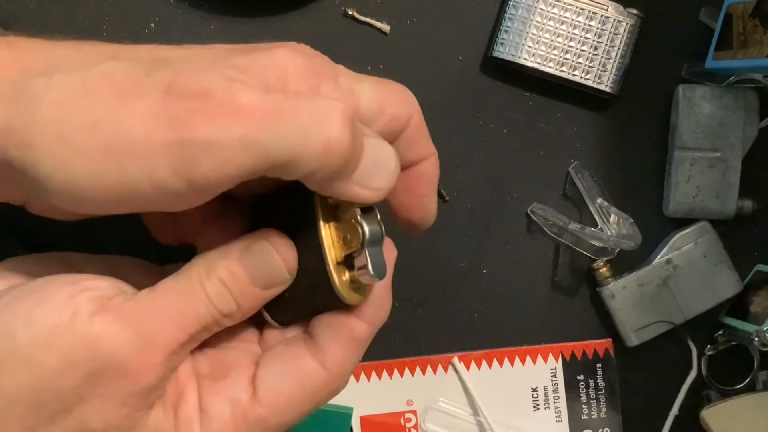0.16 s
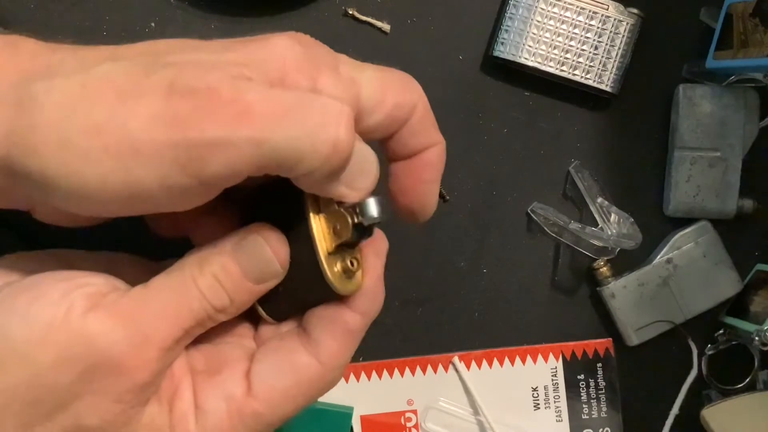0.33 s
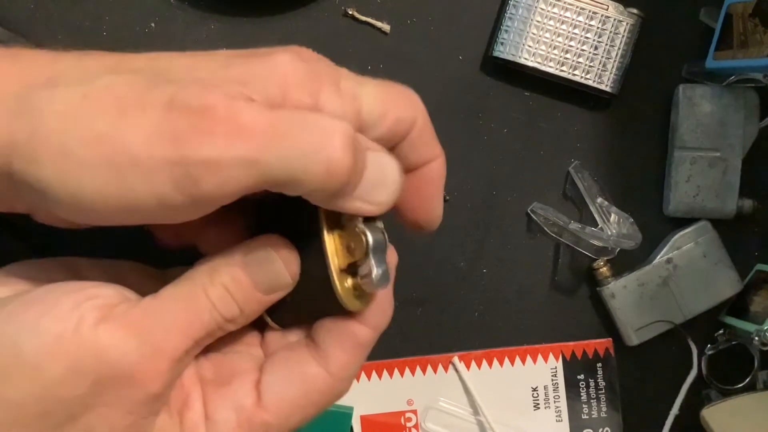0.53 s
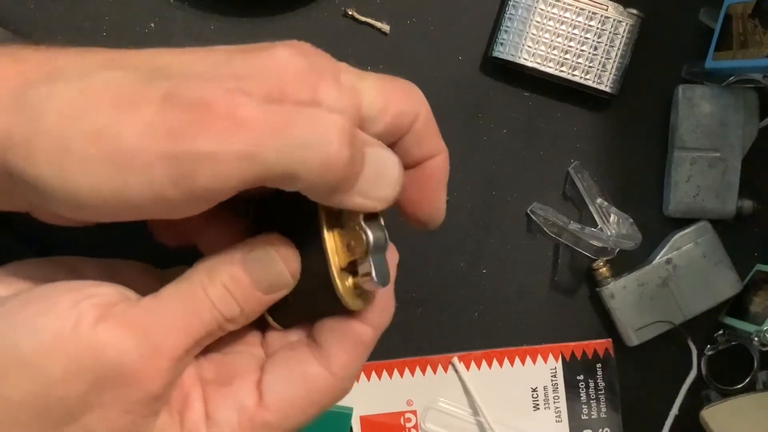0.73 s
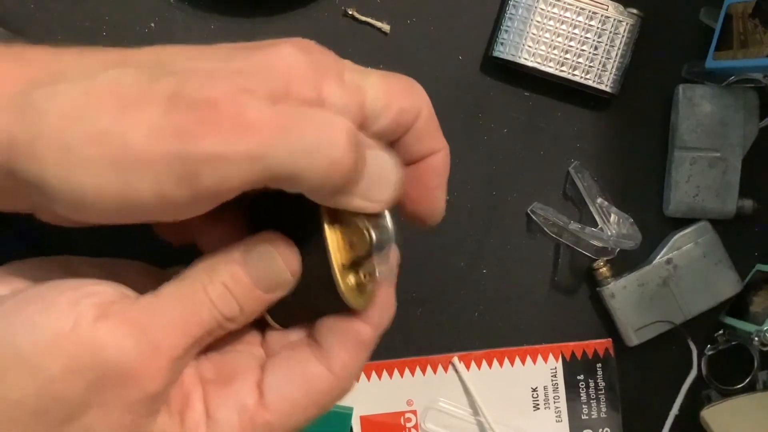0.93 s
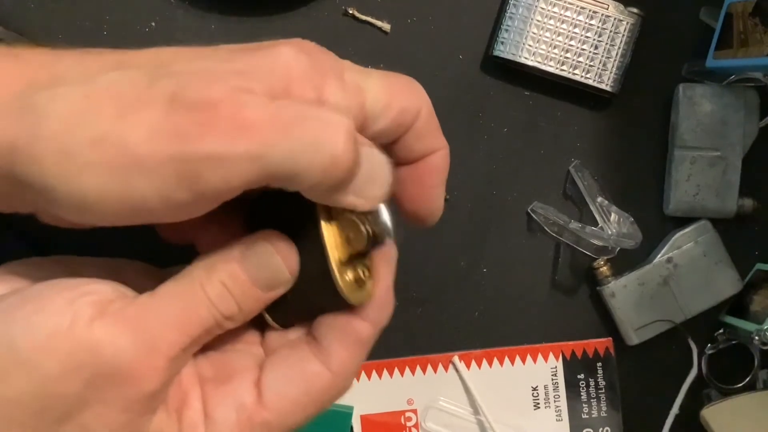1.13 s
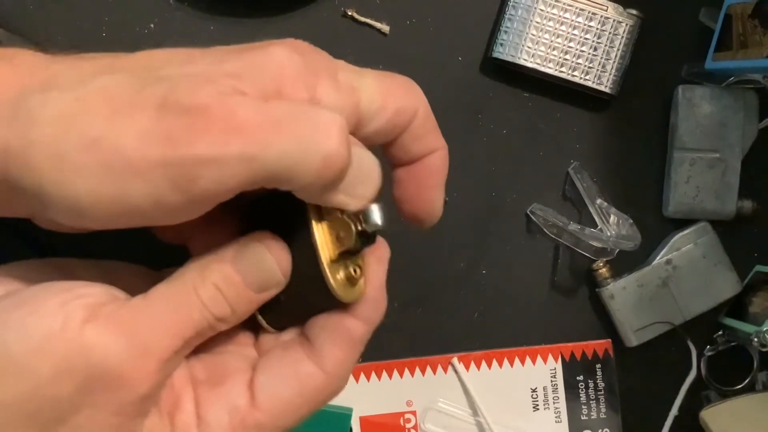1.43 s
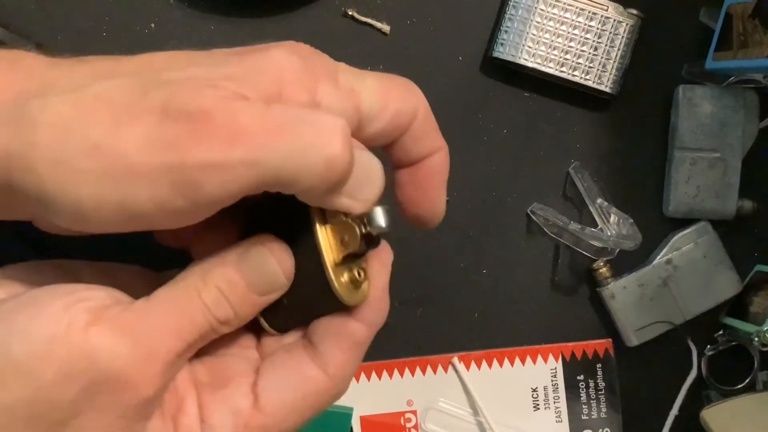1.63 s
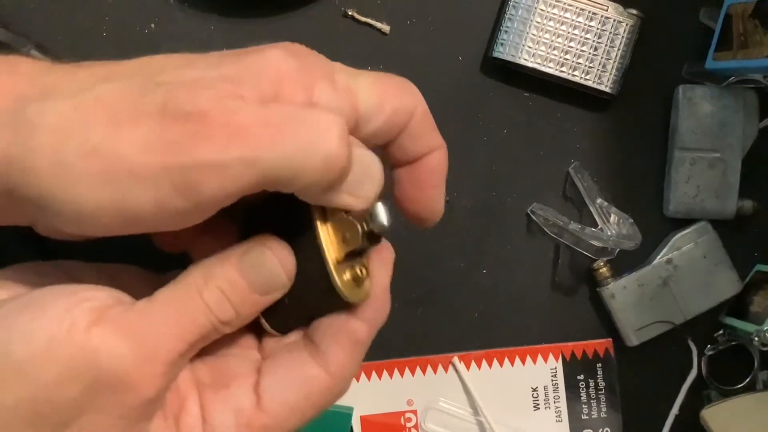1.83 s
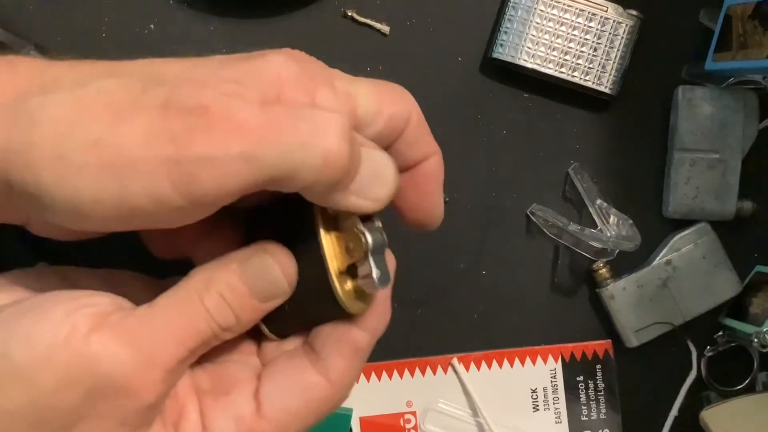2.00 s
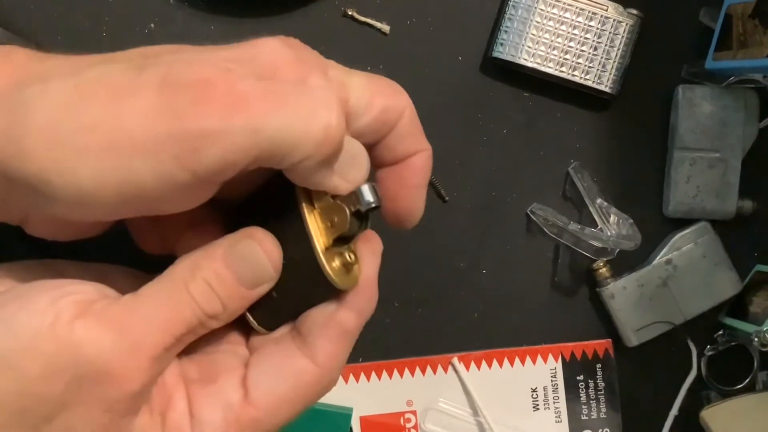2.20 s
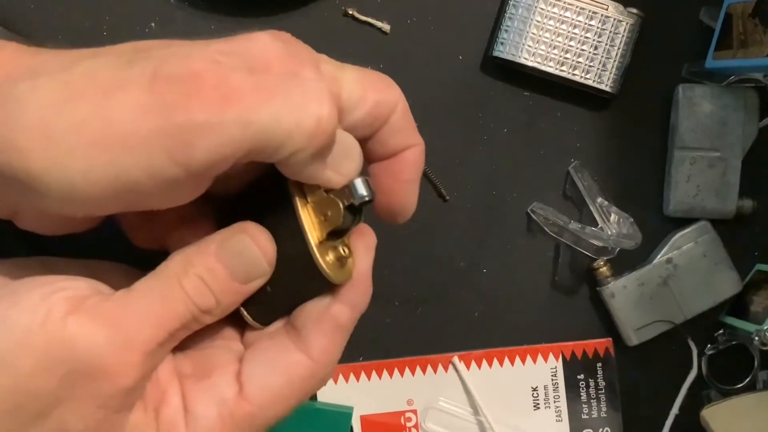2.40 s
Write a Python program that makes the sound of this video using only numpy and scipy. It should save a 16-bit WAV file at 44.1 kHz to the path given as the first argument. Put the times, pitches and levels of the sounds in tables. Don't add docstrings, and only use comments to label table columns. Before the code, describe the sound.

Rapid sharp metallic clicks and ratchet ticks of a hand-pumped metal lighter in a small room

```python
import sys
import numpy as np
from scipy import signal
from scipy.fft import rfft, irfft, next_fast_len
from scipy.io import wavfile
from scipy.ndimage import uniform_filter1d, map_coordinates

SR = 44100
rng = np.random.default_rng(int(sys.argv[2]) if len(sys.argv) > 2 else 0)


def how_loud(loudness_db):
    steps = np.asarray(loudness_db, float) / 20
    return 10 ** steps


def dump(signal):
    limited = np.clip(np.atleast_2d(signal).T, -1, 1)
    pcm = np.round(limited * 32767).astype(np.int16)
    wavfile.write(sys.argv[1], SR, pcm)


N = 112454

# f/Hz, level/dB per Hz
AIR_COLOUR = [(20, 1), (60, 0), (116, -8.5), (182, -13.5), (337, -24.5), (1190, -38.5), (5530, -43),
              (16000, -46.5)]
# t/s, level/dB
HUM_LEVEL = [
    (0.0, -45),
    (0.16, -45.5),
    (0.4, -55),
    (0.53, -48),
    (0.72, -65.5),
    (2.5, -58),
    (2.55, -54),
]
# t/s, level/dB
DRONE_LEVEL = [
    (0.0, -47.5),
    (0.02, -48.5),
    (0.23, -46.5),
    (0.3, -67),
    (0.38, -45.5),
    (2.14, -64.5),
    (2.55, -39.5),
]
# f/Hz, level/dB
DRONE_TONES = [(57, -1), (81, -2.5)]
# t/s, level/dB, length/s
TRUNDLE_BUMPS = [
    (1.71, -62, 0.086),
    (1.816, -52, 0.06),
    (1.933, -45, 0.04),
    (2.036, -42, 0.053),
    (2.135, -47.5, 0.038),
    (2.208, -47, 0.023),
    (2.25, -53, 0.046),
    (2.329, -44, 0.035),
    (2.414, -47.5, 0.045),
    (2.523, -51, 0.041),
]
# f/Hz, width/Hz, level/dB
FLOORBOARDS = [(150.6, 55, -16), (272, 30, 0), (434, 66, -6), (608, 280, -15), (800, 137, -14.5),
               (1063, 460, -28)]
# t/s, level/dB
THUMB_LEVEL = [
    (2.08, -82),
    (2.17, -70),
    (2.3, -72.5),
    (2.4, -88),
]
# f/Hz, width/Hz, level/dB
THUMB_RING = [(4450, 1100, -2), (5100, 1200, -8)]
# f/Hz, time to fall 60 dB/s
ROOM_T60 = [(300, 0.077), (1500, .2), (4500, 0.21), (8000, 0.17), (14000, 0.15)]
# f/Hz, level/dB
ROOM_TONE = [(500, -29.5), (1500, -9.5), (2400, -14), (3200, -5), (4600, -3.5), (5700, 2), (6900, -5),
             (10000, -10.5), (15500, -20)]
# f/Hz, width/Hz, level/dB
SHELL_RING = [(3610, 150, -3), (4520, 300, 4), (5450, 150, -4), (6800, 400, 4), (8200, 200, -4)]
# f/Hz, width/Hz, level/dB
PAWL_RING = [(1170, 560, -15), (3025, 380, 0), (3628, 400, 1), (4608, 500, 3), (5453, 990, -1.5),
             (6607, 890, -6.5), (8613, 2300, -15.5), (11380, 2500, -19), (13040, 2200, -19)]
# t/s, level/dB, low resonances/dB, high resonances/dB
TEETH_DOWN = [(0.198, -43.5, 4, -10.5), (0.2146, -36, 5, -3), (0.2183, -33.5, 6, 5.5),
              (0.2336, -25.5, -1, 0), (0.526, -44, 2, -6.0), (0.5386, -25.5, 7.5, 0),
              (0.5461, -35.5, 0.0, -2), (0.549, -42, 7, -3), (0.7907, -35, -10, 6), (0.7923, -38, 3, 0),
              (0.8008, -36.5, 1.0, -10), (0.8052, -29, 2, -3.0), (1.0126, -25, -2, -3),
              (1.0165, -43.0, -1.0, 5.0), (1.0184, -31, -4.0, -11.5), (1.0244, -28, 9.5, 2),
              (1.2305, -20.5, -9, -1.5), (1.392, -27.5, 0.5, 2.5), (1.406, -27.5, 1, -4.5),
              (1.5885, -32.5, 5.5, 0.5), (1.5878, -34, -1, -2.0), (1.5974, -28.5, 3, -4.5),
              (1.602, -32, 8, 1.0), (1.7743, -41.5, 3, 2.0), (1.7772, -31, -3, -1),
              (1.7892, -26, 1.5, -0.5), (1.7966, -24.5, 6.5, -5.0), (1.8005, -48, -9.5, -5),
              (2.0125, -24.5, 3, -2.5), (2.0205, -22.0, -8.5, -2)]
# t/s, level/dB, low resonances/dB, high resonances/dB
TEETH_UP = [(0.4162, -35.5, -4.5, -14), (0.424, -29.5, 14, -7.5), (0.4324, -22, 3, -7),
            (0.4459, -29, -1, 13.5), (0.702, -45.5, 2, 1), (0.7087, -38, 9, -9.5), (0.712, -32, 5, 1.5),
            (0.7154, -42, 9, 3), (0.719, -31, -2, -8.5), (0.7195, -29, 10, -7.5), (0.732, -27.5, 8, 2),
            (0.9337, -34.5, -2.0, 7), (0.9369, -37, 9, 2.5), (0.939, -43, 0.0, -0.5),
            (0.9419, -33.5, 4, -4), (0.9516, -31, -5, 11.5), (0.953, -26, 3, 10), (0.9566, -27.0, -12, 0),
            (1.1384, -44, 5, -2.0), (1.1453, -39.0, 11, -5.0), (1.148, -34, 11, 9), (1.155, -19.5, 3, -5.5),
            (1.1666, -27, -11, 3.5), (1.1685, -28.5, -7.0, 2.0), (1.3272, -30.5, -6.0, 0),
            (1.3358, -29.5, 6.5, 3), (1.337, -34.5, 7.5, 3), (1.3485, -23.5, -1, 17),
            (1.503, -44.5, 2.0, 6.5), (1.509, -28, 9.5, -3.5), (1.515, -35.5, 2.0, -5.0),
            (1.5172, -30.5, -6.5, 1), (1.529, -22.5, -11, 1.5), (1.702, -44, 1, -3.5),
            (1.7098, -24.5, 3, -12), (1.7179, -25, 13.5, 2.5), (1.7183, -39.5, -7.5, -9),
            (1.92, -29.5, -2, -11.0), (1.926, -37, -4, -4.0), (1.9315, -39, 2.0, 2.5),
            (1.9335, -32, -3, -3.0), (1.9462, -29, 7, -4)]
# t/s, level/dB, low resonances/dB
WHEEL_SLIPS = [(0.2398, -27, -18), (0.2404, -19, -2.0), (0.242, -13.5, -3.5), (0.5544, -28, -1),
               (0.5585, -19, -1.5), (0.5703, -31, 7), (0.809, -26, 4), (0.8129, -12.5, -7),
               (1.0284, -16, -1.5), (1.0298, -19.5, -6), (1.0351, -17.5, -6), (1.2348, -20, -4.5),
               (1.2366, -13, -5.5), (1.4101, -16.5, -2.5), (1.4128, -24, -5), (1.4147, -19.5, -5.5),
               (1.6069, -23, 3.0), (1.6089, -16, -2.5), (1.6216, -31, -1.0), (1.6221, -26, 7),
               (1.803, -26.5, -1.0), (1.8033, -24, 1.0), (1.8062, -16, -1.5), (1.8083, -16.5, -2),
               (1.809, -37, 0.0), (2.0283, -18.5, -4), (2.0323, -21.5, -3), (2.0369, -19.5, -14)]
# t/s, level/dB, rebound delay/s, rebound loss/dB, hollow knock/dB
STOP_HITS = [
    (0.2458, -12.5, 0.002, 1, -33),
    (0.563, -13.5, 0.0029, -1.5, -33),
    (0.817, -14, 0.0023, 2, -34.5),
    (1.035, -9, 0.002, 6, -31.5),
    (1.2401, -12, 0.0026, -1.5, -31),
    (1.4164, -9.5, 0.0027, 4.5, -32.5),
    (1.6132, -13, 0.0033, 0, -31.5),
    (1.8109, -9.5, 0.0028, 2, -34),
    (2.037, -12.5, 0.0027, 2.5, -33),
]
# f/Hz, width/Hz, level/dB
STOP_RING = [(1914, 89, -11), (2960, 227, -4.5), (3516, 308, 0.5), (4530, 510, -2.5), (5120, 540, -1.5),
             (6290, 790, -6.5), (7815, 350, -10.5), (9500, 740, -15), (11000, 1500, -21), (11810, 830, -16),
             (12900, 830, -14.5), (16000, 2100, -22.5)]
# f/Hz, width/Hz, level/dB
TANK_RING = [(341, 85, 4.35), (690, 44.5, 1.016), (1258, 186, 0.7), (1950, 36, 6.7)]
# t/s, level/dB, brightness/dB per octave, low resonances/dB, thud/dB
SNAP_HITS = [
    (0.4362, -4, -2, -2, -34),
    (0.7243, -9.5, 1.5, 0, -28),
    (0.9473, -5.5, -2.4, -4.5, -33.5),
    (1.1596, -7.5, -2.5, -9.5, -31),
    (1.3398, -4.5, 0.2, 4.5, -35),
    (1.5211, -5, -2.5, -2.7, -36),
    (1.7216, -4, 0, 0.4, -32.5),
    (1.94, -16.5, -3, -7, -35),
]
# f/Hz, width/Hz, level/dB
CAP_RING = [(1880, 230, -22.5), (2825, 434, -7), (3670, 492, -5), (4570, 336, -3), (5690, 404, -3),
            (6540, 1100, -10), (7840, 780, -11), (8900, 270, -9.5), (10030, 420, -8.5), (11500, 980, -18),
            (13690, 630, -12), (15600, 390, -26.5)]
# f/Hz, width/Hz, level/dB
JOLT_RING = [(437, 300, -7.5), (1050, 400, 4.5)]


def unit(x):
    return x / np.sqrt(np.mean(x ** 2) + 1e-20)


def along(points, hz):
    f, value = np.transpose(points)
    return np.interp(np.log(hz + 1), np.log(f + 1), value)


def curve(rows):
    return np.interp(np.arange(N) / SR, *np.transpose(rows))


def filtered(x, response):
    size = next_fast_len(len(x) + 4096)
    spectrum = rfft(x, size) * response(np.fft.rfftfreq(size, 1 / SR))
    return irfft(spectrum, size)[:len(x)]


def body(peaks):
    def response(f):
        total = 0
        for k, (centre, width, db) in enumerate(peaks):
            damping = 1j * f * width
            total = total + (-1) ** k * how_loud(db) * damping / (centre ** 2 - f ** 2 + damping)
        return total
    return response


def add(out, s, x):
    part = out[round(s * SR):][:len(x)]
    part += x[:len(part)]


def unsteady(hz, drift_hz):
    drift = map_coordinates(rng.standard_normal(40), [np.arange(N) * 12 / SR])
    return -np.cos(2 * np.pi * np.cumsum(hz + drift_hz * drift) / SR)


def background():
    noise = rng.standard_normal(N)
    air = how_loud(-49) * unit(filtered(noise, lambda hz: how_loud(along(AIR_COLOUR, hz)) * (hz > 18)))
    hum = how_loud(curve(HUM_LEVEL) - 2) * unsteady(119.3, 3.02)
    drone = sum(how_loud(db) * unsteady(hz, 4.96) for hz, db in DRONE_TONES)
    return air + hum + how_loud(curve(DRONE_LEVEL)) * drone


def trundle():
    t = np.arange(N) / SR
    swell = np.zeros(N)
    for s, db, length in TRUNDLE_BUMPS:
        swell += how_loud(db) * np.exp(-((t - s) / (0.73 * length)) ** 2)
    boards = body(FLOORBOARDS)
    rumble = filtered(rng.standard_normal(N), lambda f: boards(f) / (1 + (f / 1300) ** 4))
    return swell * unit(rumble)


def thumb():
    ring = body(THUMB_RING)
    rub = filtered(rng.standard_normal(N), lambda f: ring(f) ** 2)
    return how_loud(curve(THUMB_LEVEL)) * unit(rub)


def room(x):
    delay_s, rise_s, room_db, patchy_db = 0.0023, 0.00265, -18.5, 2.5
    hz, t, noise = signal.stft(rng.standard_normal(N), SR, nperseg=128)
    click_energy = np.abs(uniform_filter1d(x ** 2, size=64))
    energy = np.interp(t - delay_s, np.arange(N) / SR, click_energy)
    age = t[:300]
    fall_db = along(ROOM_TONE, hz)[:, None] - 60 * age / along(ROOM_T60, hz)[:, None]
    tail = how_loud(fall_db) * (1 - np.exp(-age / rise_s))
    power = signal.fftconvolve(energy[None], tail ** 2, axes=1)[:, :len(t)]
    level = np.sqrt(np.abs(power) / np.mean(np.sum(tail ** 2, axis=1)))
    patches = uniform_filter1d(rng.standard_normal(noise.shape), size=2, axis=0)
    patches = unit(uniform_filter1d(patches, size=12, axis=1))
    echoes = signal.istft(noise * level * how_loud(patchy_db * patches), SR, nperseg=128)[1][:N]
    shell = body(SHELL_RING)
    return how_loud(room_db) * filtered(echoes, lambda f: np.sqrt(1 + np.abs(shell(f)) ** 2))


def even(x):
    z = rfft(x, 2 * len(x))
    colour = np.sqrt(np.abs(uniform_filter1d(np.abs(z) ** 2, size=50)) + 1e-12)
    return irfft(z / colour)[:len(x)]


def contact(peaks, db, t60, hold=0., tilt=0., low_db=0., high_db=0., rise=0.000067, blow=0.):
    scatter_db, detune = 1.5, 0.012
    t = np.arange(2048) / SR
    stirred = []
    for centre, width, gain in peaks:
        pitch_luck, level_luck = rng.standard_normal(2)
        gain = gain + scatter_db * level_luck + tilt * np.log2(centre / 4500)
        gain += low_db * (centre < 4000) + high_db * (centre > 7000)
        stirred.append((centre * (1 + detune * pitch_luck), width, gain))
    shape = (1 - np.exp(-t / rise)) * how_loud(-60 * np.maximum(t - hold, 0) / t60)
    push = rng.standard_normal(len(t)) * shape + blow * (t == 0)
    x = filtered(even(push), body(stirred))
    return how_loud(db) * x / np.abs(x).max()


def add_slip(out, s, db, t60, low_db, high_db=0.):
    x = contact(PAWL_RING, db, t60, low_db=low_db, high_db=high_db, rise=0.00065)
    add(out, s - np.argmax(np.abs(x)) / SR, x)


def ratchet(out):
    first_tooth = [(0.194, -52.5, 1, -8)]
    for s, db, low_db, high_db in first_tooth + TEETH_DOWN + TEETH_UP:
        add_slip(out, s, db + 0.084, 0.014, low_db, high_db)


def grind(out):
    for s, db, low_db in WHEEL_SLIPS:
        add_slip(out, s, db + 0.1, 0.012, low_db)


def stop(out):
    t60 = 0.017
    for s, db, later, loss_db, knock_db in STOP_HITS:
        add(out, s + 0.0004, contact(STOP_RING, db + 1.5, t60, high_db=3, blow=7.1))
        add(out, s + later, contact(STOP_RING, db + 2.5 - loss_db, t60, tilt=-0.83, blow=13))
        add(out, s - 0.003, contact(TANK_RING, knock_db, 0.012, hold=0.0064, blow=23.3))


def snap(out):
    for s, db, tilt, low_db, thud_db in SNAP_HITS:
        cap = contact(CAP_RING, db + 2, 0.013, tilt=tilt, hold=0.00074, low_db=low_db, blow=6.68)
        add(out, s + 0.0004, contact(JOLT_RING, thud_db, 0.006, blow=45))
        add(out, s + 0.00036, cap)


def lighter():
    out = np.zeros(N)
    ratchet(out)
    grind(out)
    stop(out)
    snap(out)
    return out


def scene():
    clicks = lighter()
    return (background() + trundle() + thumb() + room(clicks) + clicks)[None]


def top_cut(x):
    return signal.sosfilt(signal.butter(12, 16980, fs=SR, output="sos"), x)


def record(dry):
    x = filtered(dry[0], lambda hz: how_loud(-28 / (1 + (15720 / (hz + 1)) ** 80)))
    return top_cut(x[None])


dry = scene()
out = record(dry)
dump(out)
```